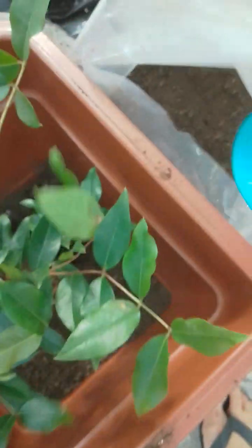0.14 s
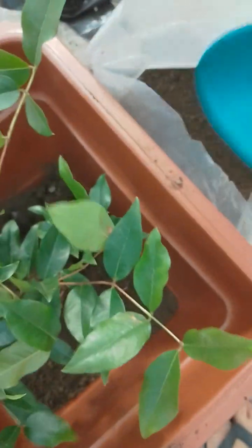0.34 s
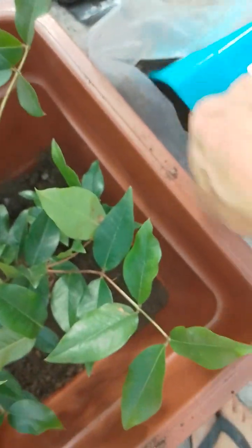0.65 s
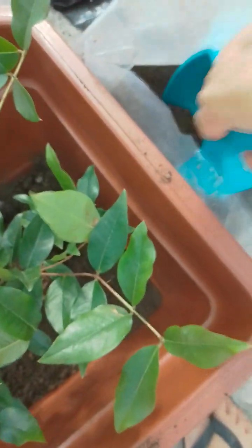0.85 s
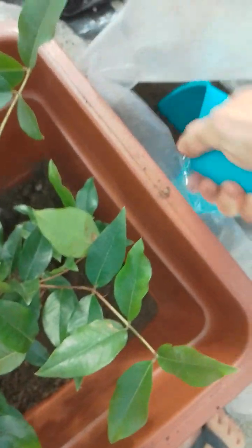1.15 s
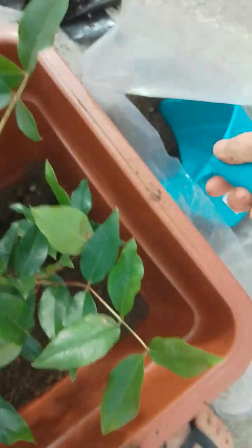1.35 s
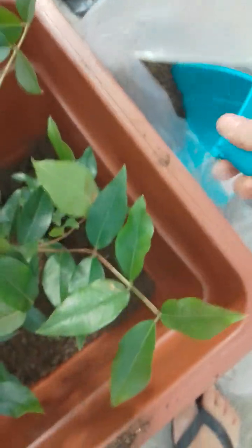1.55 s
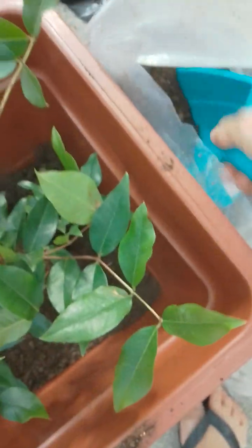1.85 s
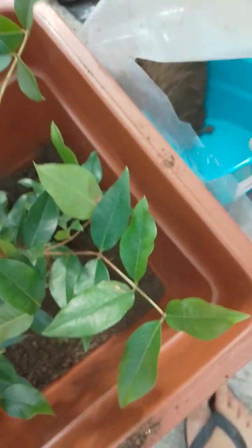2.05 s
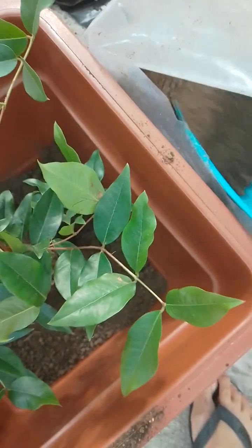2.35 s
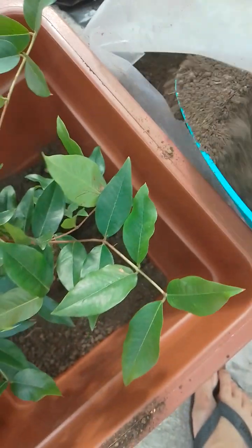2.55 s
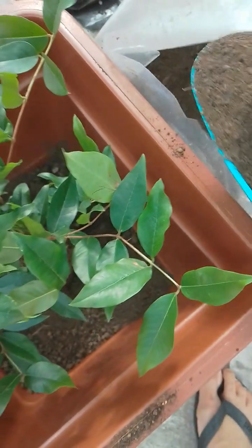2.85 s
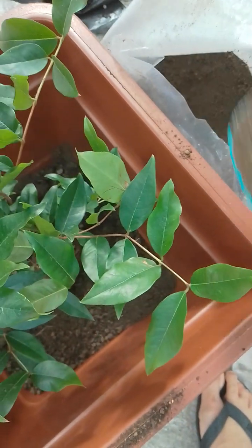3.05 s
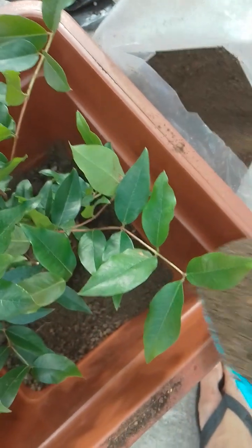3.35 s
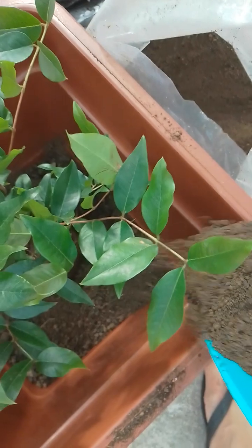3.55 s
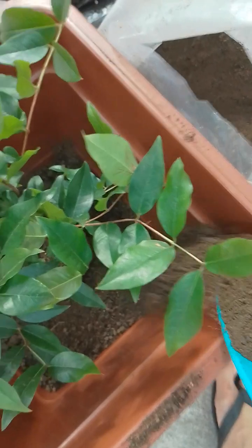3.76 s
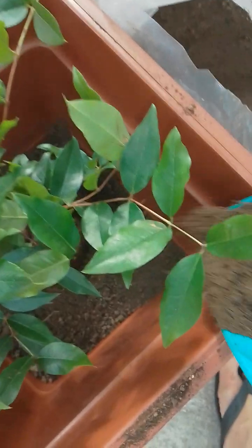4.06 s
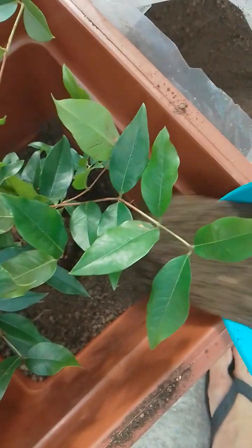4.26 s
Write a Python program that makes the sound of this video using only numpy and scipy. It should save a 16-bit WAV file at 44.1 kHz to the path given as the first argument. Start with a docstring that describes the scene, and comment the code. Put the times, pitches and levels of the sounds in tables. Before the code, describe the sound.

Very quiet at first, with a faint low bag movement around 0.2 seconds. From 0.3 to 1.0 a plastic scoop pushes into potting soil: bright airy hiss of grit over bag film, crackling creases, coarse rasp, and a sharp snap at 0.9 with a low boom. From 1.1 to 1.8 the film quiets and hollow plastic scraping and pebble ticks stand out, with another soft boom near 1.6. A lull around 1.9 to 2.1, then a longer, fuller drag from 2.2 to 3.0, gritty and hissing, with snaps, dull lumps and bassy bumps near 2.7 and 2.8. It fades to near silence by 3.3. From about 3.75 to 4.05 soil tips into the planter in a short gritty rush with fine bright crackles and a small hollow thud at 4.0. A faint low rub of scoop on rim closes it at 4.4. Close, dry, small-room sound.

```python
"""Bag film hisses and snaps as a plastic scoop digs potting soil, is dragged out and tipped into a planter.
Hiss, rasp, boom and shifting soil: filtered noise on level curves. Snaps and knocks: short noise bursts.
Thuds: decaying sines. Scoop on rim: resonant noise. Short copies from surfaces near the hand comb the
colour; a faint room tail and still air lie beneath."""
import sys
import numpy as np
from scipy import signal
from scipy.fft import rfft, irfft, next_fast_len
from scipy.io import wavfile
from scipy.ndimage import map_coordinates

SR = 44100
rng = np.random.default_rng(int(sys.argv[2]) if len(sys.argv) > 2 else 0)


def pcm_store(signal):
    """Save signal as 16-bit PCM."""
    levels = np.round(np.clip(np.atleast_2d(signal), -1, 1) * 32767)
    wavfile.write(sys.argv[1], SR, levels.astype(np.int16).T)


def ratio(d):
    """dB to gain"""
    e = np.asarray(d, float) / 20
    return 10 ** e


N = 194436  # samples


def unit(x):
    """Scale to rms 1."""
    return x / np.sqrt(np.mean(x ** 2) + 1e-20)


def along(points, hz):
    """Interpolate (f/Hz, value) points on a log frequency axis."""
    f, value = np.transpose(points)
    return np.interp(np.log(hz + 1), np.log(f + 1), value)


def curves(rows):
    """One value per sample for each column after the time."""
    s, *columns = np.transpose(rows)
    return [np.interp(np.arange(N) / SR, s, column) for column in columns]


def wobble(rate_hz):
    """Smooth random curve, rate_hz knots a second."""
    knots = rng.standard_normal(int(N * rate_hz / SR) + 4)
    return map_coordinates(knots, [np.arange(N) * rate_hz / SR])


def filtered(x, response):
    """Apply a complex response of frequency."""
    m = next_fast_len(N + 8192)
    return irfft(rfft(x, m) * response(np.fft.rfftfreq(m, 1 / SR)), m)[..., :N]


def shaped(x, points):
    """Unit-rms x, coloured by (f/Hz, level/dB) points."""
    return unit(filtered(x, lambda hz: ratio(along(points, hz))))


def modes(table):
    """Causal response of second-order resonances, summed with alternating sign."""
    def response(f):
        return sum((-1) ** k * ratio(db) * 1j * f * width / (centre * centre - f * f + 1j * f * width)
                   for k, (centre, width, db) in enumerate(table))
    return response


def grit(rate_hz, spread_db, smooth, clump_db):
    """Grains of uneven size in clumps, over a smooth share of noise."""
    sizes = (rng.random(N) < rate_hz / SR) * ratio(2 * spread_db * rng.exponential(size=N))
    decay = np.exp(-np.arange(400) / SR / 0.00067)  # power falls by 1/e in 0.67 ms
    power = signal.fftconvolve(sizes, decay)[:N]
    share = np.clip(smooth, 0, 1)
    envelope = np.sqrt(share + (1 - share) * abs(power) / power.mean())
    clumps = ratio(clump_db * (wobble(24.53) + 0.81 * wobble(90)))
    return unit(envelope * rng.standard_normal(N) * clumps)


def small(level_db, lo_hz, hi_hz, t60_ms, count, spread_db=2):
    """Random events (t/s, level/dB, f/Hz, t60/ms) whose strength follows a level curve."""
    when, size, pitch = rng.random((count, 3)).T
    db = level_db[(when * N).astype(int)] - spread_db * np.log(1 - size)
    hz = lo_hz * (hi_hz / lo_hz) ** pitch
    return [(s, d, f, t60_ms) for s, d, f in zip(when * N / SR, db, hz)]


def bursts(events, response, rise_ms, gain_db):
    """A short noise burst for each event (t/s, level/dB, f/Hz, t60/ms), coloured round its own pitch."""
    out, t = np.zeros(N + 2048), np.arange(2048) / SR
    f = np.fft.rfftfreq(2048, 1 / SR)
    for s, db, hz, t60_ms in events:
        rise = 1 - np.exp(-(1000 * t / rise_ms) ** 2)
        shape = rise * ratio(-60000 * t / max(t60_ms, 2))
        burst = irfft(rfft(shape * rng.standard_normal(2048)) * response(f, hz))
        out[round(s * SR):][:2048] += ratio(db + gain_db) * burst / abs(burst).max()
    return out[:N]


# still-air spectrum: (f/Hz, relative level/dB per Hz)
AIR_SPECTRUM = [(25, 8), (60, 3.5), (200, -10.5), (500, -25), (900, -10), (1600, -27.5), (3000, -20),
                (8000, -43), (12000, -34), (16000, -20)]


def still_air():
    """Steady noise floor with a fixed spectrum."""
    level_db = -76.5
    return ratio(level_db) * shaped(rng.standard_normal(N), AIR_SPECTRUM)


# room decay: (f/Hz, t60/s)
ROOM_DECAY = [(200, 0.14), (2000, 0.34), (10000, .12)]


def room(x):
    """Diffuse noise tail after a short delay; each frequency dies at its own speed."""
    hz, t, z = signal.stft(rng.standard_normal(SR // 2), SR, nperseg=256)
    decay = ratio(-60 * t / along(ROOM_DECAY, hz)[:, None])
    tail = signal.istft(z * decay, SR, nperseg=256)[1]
    delayed = np.pad(x, (300, 0))
    return signal.fftconvolve(delayed, tail / np.linalg.norm(tail))[:N]


# surfaces facing the hand for a while: (start t/s, end t/s, delay/ms, signed share)
SURFACES = [(0, .3, .311, .39), (0, .3, .379, .3), (.3, 1.1, .325, .14), (.3, .62, .79, -.22),
            (.3, .62, 1.77, -.16), (.45, 1.1, 1.63, -.13), (.9, 1.1, .63, .17), (1.1, 1.5, .325, .4),
            (1.1, 1.5, .525, -.24), (1.1, 1.5, .6, .25), (1.1, 1.85, .812, -.3), (1.1, 2.45, 1.14, -.24),
            (1.1, 1.5, 1.555, -.2), (1.5, 1.85, .885, .2), (1.5, 1.85, 1.285, -.25), (1.5, 1.85, 1.38, .33),
            (1.5, 1.85, 1.445, .22), (1.85, 2.1, .6, .3), (1.85, 2.1, .68, -.3), (1.7, 2.45, 1.615, -.25),
            (2.1, 2.45, 1.395, .22), (2.1, 2.75, 1.485, -.28), (2.1, 2.45, 1.55, .2),
            (2.45, 3.1, 1.345, .15), (2.45, 3.5, .335, .2), (2.75, 3.1, 1.01, -.22),
            (2.75, 3.1, 1.265, -.18), (2.75, 3.5, 1.638, -.22), (2.85, 3.1, 2.793, -.2),
            (3.1, 3.5, .665, -.22), (3.1, 3.5, .75, .22), (3.6, 4.1, .378, .24), (3.6, 3.88, 1.73, -.24),
            (3.6, 3.88, 1.82, .32), (3.6, 4.1, .95, -.4), (3.88, 4.1, .886, -.35), (3.7, 4.1, .575, .26),
            (3.88, 4.1, .712, -.36), (3.88, 4.1, 1.07, .3), (3.88, 4.1, 1.185, -.28),
            (3.88, 4.5, 1.515, .24), (3.88, 4.5, 1.62, -.2), (4.1, 4.5, 1.425, -.18)]


def nearby(x):
    """Short copies fade in and out as surfaces, and passing folds of the bag, turn toward the hand."""
    turn_s, fold_s, fold_share = 0.087, 0.84, 0.076
    when, far, sign = rng.random((14, 3)).T
    middle_s = when * N / SR
    delay_ms = 2.0 + 2.0 * far
    folds = np.transpose([middle_s - fold_s / 2, middle_s + fold_s / 2,
                          delay_ms, fold_share * np.sign(sign - .5)])
    rows = np.vstack([SURFACES, folds])
    copies = filtered(x, lambda hz: np.exp(-2j * np.pi * np.outer(rows[:, 2], hz) / 1000))
    t, out, power = np.arange(N) / SR, x.copy(), np.ones(N)
    for (start, end, _, share), copy in zip(rows, copies):
        gain = share * np.clip(np.minimum(t - start, end - t) / turn_s + .5, 0, 1)
        out += gain * copy
        power += gain ** 2
    return out / np.sqrt(power)


# planter rim under the resting scoop: (f/Hz, width/Hz, level/dB)
RIM_MODES = [(130.4, 10, -2), (685, 72, -2.5)]
# rub of scoop on rim: (t/s, level/dB)
RUB_LEVEL = [(4.08, -88), (4.16, -73), (4.25, -67.5), (4.41, -68)]


def rest():
    """The emptied scoop rubs along the rim: noise through the rim's resonances."""
    rub = filtered(rng.standard_normal(N), modes(RIM_MODES))
    rub = filtered(rub, modes([(300, 780, 0)]))
    return ratio(curves(RUB_LEVEL)[0]) * unit(rub)


# bag resonances: (f/Hz, width/Hz, level/dB)
BAG_MODES = [(83.1, 23, -1.5), (60, 81, -8.5), (120, 63, -7)]
# spectrum of shifting soil: (f/Hz, relative level/dB per Hz)
SOIL_SPECTRUM = [(100, -12), (160, 2.5), (280, 0.5), (450, -3), (700, -6.5), (1200, -27)]
# moving weight: (t/s, boom level/dB, shifting soil level/dB)
LOAD_LEVELS = [(0, -77.5, -72.5), (.18, -51.5, -70), (.27, -56, -73.5), (.36, -53.5, -52.5),
               (.45, -58, -71), (.53, -61, -48.5), (.7, -92, -57.5), (.87, -74, -59), (.99, -47, -54),
               (1.1, -54, -61), (1.28, -58.5, -65.5), (1.37, -78, -58), (1.52, -59.5, -57),
               (1.57, -43, -58.5), (1.66, -51.5, -70), (1.73, -54, -51.5), (1.82, -52.5, -64.5),
               (2.04, -73.5, -77.5), (2.14, -57, -55.5), (2.25, -47.5, -54.5), (2.32, -53.5, -56),
               (2.47, -57.5, -50), (2.64, -62.5, -50.5), (2.7, -41.5, -54.5), (2.77, -57, -50.5),
               (2.81, -43.5, -57.5), (2.9, -52, -51.5), (2.94, -59, -54.5), (3.1, -55.5, -62.5),
               (3.16, -66.5, -72.5), (3.45, -72.5, -83), (3.57, -83.5, -83.5), (3.73, -78, -83),
               (3.77, -61.5, -65), (3.84, -75.5, -60), (4.03, -71, -59.5), (4.15, -78, -72.5),
               (4.41, -62.5, -99)]


def load():
    """The heavy bag booms at its resonances; the mass of soil shifts as sparse low grit."""
    boom_db, soil_db = curves(LOAD_LEVELS)
    boom = filtered(rng.standard_normal(N), modes(BAG_MODES))
    boom = unit(filtered(boom, modes([(85, 51, 0)])))
    soil = shaped(grit(190, 2.8, 0.42, 0.64), SOIL_SPECTRUM)
    return ratio(boom_db) * boom + ratio(soil_db) * soil


# lumps landing: (t/s, relative level/dB, f/Hz, t60/ms)
LUMPS = [(0.951, -31.5, 204, 50), (2.287, -27, 150, 38), (2.446, -29, 798, 60), (2.601, -26.5, 256, 44),
         (2.972, -28.5, 297, 39), (3.751, -34, 258, 63), (4.007, -18, 544, 23.4)]


def thuds():
    """Lumps of soil land on plastic: soft-onset sines with exponential decay."""
    out, t = np.zeros(N + SR), np.arange(SR // 5) / SR
    for s, db, hz, t60_ms in LUMPS:
        decay = ratio(db - 1.0 - 60000 * t / t60_ms)
        onset = 1 - np.exp(-t / 0.006)
        out[round(s * SR):][:len(t)] += decay * onset * np.sin(2 * np.pi * hz * t)
    return out[:N]


# hand strokes: (t/s, relative hiss level/dB, relative rasp level/dB)
STROKE_LEVELS = [(0, -85, -67.5), (.186, -91.5, -76.5), (.265, -77.5, -61.5), (.333, -50, -56),
                 (.4, -53, -59.5), (.513, -44, -44), (.575, -52.5, -66), (.641, -42, -51.5),
                 (.712, -40, -44), (.826, -47, -52.5), (.894, -37.5, -45.5), (.95, -49.5, -56.5),
                 (1.11, -58, -48), (1.19, -61, -48), (1.22, -59.5, -48.5), (1.269, -62.5, -43.5),
                 (1.339, -74.5, -55.5), (1.391, -69, -43), (1.511, -79, -54.5), (1.544, -64.5, -52),
                 (1.63, -57.5, -48.5), (1.688, -64, -51.5), (1.765, -59.5, -58), (1.83, -78, -64.5),
                 (1.892, -71, -60.5), (1.95, -83, -70), (1.99, -79, -63.5), (2.013, -66, -59),
                 (2.103, -80, -63.5), (2.131, -68.5, -51.5), (2.225, -56.5, -45.5), (2.303, -52, -44),
                 (2.411, -51.5, -48.5), (2.46, -45, -39.5), (2.526, -44.5, -49), (2.614, -43.5, -43.5),
                 (2.75, -51, -52.5), (2.965, -48, -46), (3.045, -54, -52), (3.105, -63, -59),
                 (3.257, -83, -71.5), (3.488, -93, -82.5), (3.706, -90.5, -71.5), (3.736, -85, -69.5),
                 (3.807, -81, -68), (3.839, -63, -56.5), (3.933, -51, -47.5), (3.979, -50, -57),
                 (4.005, -49, -49.5), (4.061, -63, -60.5), (4.143, -72.5, -70), (4.41, -81, -76)]


def stroke():
    """Hiss and rasp level curves in dB, shared by all sounds the strokes drive."""
    return curves(STROKE_LEVELS)


# scoop shell resonances: (f/Hz, width/Hz, level/dB)
SHELL_MODES = [(495, 100, -7), (884, 110, 3), (1380, 110, 1.5), (2065, 220, -9), (2900, 57, -9)]


def shell(f):
    """Modal response of the scoop's shell."""
    return modes(SHELL_MODES)(f)


# pebble taps: (t/s, relative level/dB, strongest f/Hz)
TAPS = [(0.313, -47, 850), (0.334, -38.5, 805), (0.395, -31.5, 2140), (0.478, -31, 920),
        (0.545, -29.5, 1900), (0.775, -26.5, 1650), (0.9, -26.5, 1520), (1.082, -49, 860),
        (1.153, -33, 980), (1.214, -28.5, 1420), (1.258, -38, 820), (1.368, -36, 1290),
        (1.383, -32.5, 1300), (1.393, -27.5, 1300), (1.532, -27, 1400), (1.559, -31, 1290),
        (1.573, -34.5, 1320), (1.72, -35.5, 985), (1.894, -42, 920), (2.006, -46.5, 931),
        (2.135, -34.5, 900), (2.166, -34, 920), (2.193, -31.5, 915), (2.242, -31.5, 1380), (2.28, -30, 870),
        (2.337, -34.5, 1990), (2.457, -28, 900), (2.602, -38, 1020), (2.722, -42.5, 820),
        (2.77, -33.5, 2470), (3.011, -36, 1480), (3.133, -45, 1036), (3.609, -57.5, 919),
        (3.752, -44.5, 950), (3.775, -43, 2170), (3.846, -38, 1610), (3.898, -32, 2050),
        (3.926, -32.5, 1430), (3.998, -35.5, 1430)]


def knocks():
    """Pebbles tap the shell: short bursts at a pitch of their own plus the shell modes, treble softened."""
    t60_ms = 11.5
    taps = [(*tap, t60_ms) for tap in TAPS]
    taps += small(stroke()[1] - 4, 710, 2400, t60_ms, count=60)

    def response(f, hz):
        soft = 1 / (1 + 1j * f / 3400.0) ** 2
        return (modes([(hz, 350, 0)])(f) + 0.37 * shell(f)) * soft
    return bursts(taps, response, rise_ms=0.42, gain_db=-2.1)


# upper shell modes: (t/s, lift/dB)
UPPER_LIFT = [(0, -5.5), (.5, -10), (1.1, -1.5), (1.45, 1.5), (1.8, 3), (2.0, -2.5), (2.3, 6), (2.7, 2.5),
              (2.95, 3.5), (3.06, 6), (3.3, -0.5), (3.7, 0.5), (3.9, 5.5), (4.1, 6.5), (4.41, 1)]


def rasp():
    """Coarse grit scrapes the scoop and rings its shell; the level of its upper modes varies."""
    grains = grit(400, 2.05, 0.51, 1.15)
    ring = unit(filtered(grains, lambda hz: shell(hz) / (1 + 1j * hz / 1600.0)))
    upper = filtered(ring, lambda hz: hz ** 8 / (hz ** 8 + 1820.0 ** 8))
    lifted = ring + (ratio(curves(UPPER_LIFT)[0]) - 1) * upper
    return ratio(stroke()[1] - 3.5) * lifted


# film creases: (t/s, relative level/dB, centre f/Hz, t60/ms)
CREASES = [(0.4768, -20.5, 5600, 21), (0.5106, -21.5, 5760, 15), (0.5196, -20.5, 2980, 17),
           (0.5457, -16, 9400, 12.5), (0.5533, -16, 3330, 16), (0.8741, -22.5, 6000, 28),
           (0.9001, -6.5, 6440, 8.1), (1.0778, -26.5, 6300, 4.2), (1.151, -33.5, 5430, 9.3),
           (1.2123, -22, 6250, 35), (1.272, -34.5, 2900, 9.3), (1.5322, -30, 2780, 17),
           (1.616, -28, 10000, 15), (1.7295, -26, 9900, 17), (1.887, -56, 2800, 12.5),
           (2.0039, -34, 6750, 13.5), (2.134, -58.5, 2850, 12.5), (2.1505, -49, 2790, 12.5),
           (2.166, -52, 2960, 12.5), (2.2187, -19.5, 7700, 16), (2.3366, -32, 2810, 15),
           (2.4503, -22.5, 2770, 29), (2.562, -22, 2940, 18), (2.6022, -22.5, 3020, 9.1),
           (2.6694, -25, 2720, 12.5), (2.7708, -19, 3620, 12.5), (2.9704, -30, 7610, 10),
           (3.0474, -37, 9000, 12.5), (3.2857, -58, 2560, 12.5), (3.3997, -58.5, 2730, 12.5),
           (3.7737, -43, 5270, 16), (3.8437, -29, 10500, 6), (3.8892, -25.5, 10700, 12.5),
           (3.9309, -21.5, 8800, 17), (3.982, -19.5, 10000, 20), (4.0144, -29, 4850, 12.5),
           (4.0527, -31, 5760, 11), (4.0687, -29, 7100, 8.9)]


def snaps():
    """Each crease of film snaps: broad crackle with a peak of its own."""
    creases = list(CREASES) + small(stroke()[0] + 16, 2700, 12000, t60_ms=12, count=90)

    def response(f, hz):
        return modes([(hz, .5 * hz, 0)])(f) + 0.23 * modes([(6000, 9000, 0)])(f)
    return bursts(creases, response, rise_ms=0.85, gain_db=-4)


# film spectrum: (f/Hz, relative level/dB per Hz)
FILM_SPECTRUM = [(900, -33.5), (1500, -5.5), (2200, -6), (3500, -5.5), (5000, -1.5), (7000, -2.5),
                 (10000, -1.5), (12500, -10.5), (16000, -13)]
# hiss colour: (t/s, relative level of low part/dB, top-end lift/dB)
HISS_COLOUR = [(0, -3, 5), (.4, -5, -24), (.52, -3.5, 9.5), (.7, -4, 18.5), (1.15, -6, -6),
               (1.45, -8.5, -19), (1.62, -5.5, 12), (1.76, -10.5, 12), (2.0, -9, 1), (2.1, -4.5, 1),
               (2.2, -7.5, -32), (2.31, -3, -11), (2.44, -5.5, -10.5), (2.6, -5, -26), (3, -6, 13.5),
               (3.1, -8, 6), (3.25, -5.5, 11), (3.5, -2.5, 4), (3.75, 1.5, 14), (3.9, -6.5, 15.5),
               (4.4, -2, 7)]


def hiss():
    """Fine soil slides over the bag film; its colour tips with the angle to the microphone."""
    low_db, top_db = curves(HISS_COLOUR)
    rush = shaped(grit(1500, 1.9, 0.55, 1.4), FILM_SPECTRUM)
    top = filtered(rush, lambda hz: hz ** 4 / (hz ** 4 + 15840.0 ** 4))
    low = filtered(rush, lambda hz: 5860.0 ** 4 / (hz ** 4 + 3650.0 ** 4))
    tilted = rush + (ratio(top_db) - 1) * top + (ratio(low_db + 5.5) - 1) * low
    return ratio(stroke()[0] + 1.5) * tilted


def scene():
    """Hand sounds with their copies, thuds, rim rub and room, over the still air."""
    hand = nearby(hiss() + rasp() + snaps() + knocks() + load()) + thuds() + rest()
    return (hand + ratio(-18) * room(hand) + still_air())[None]


def roll_off(x):
    """The treble ends steeply here."""
    return signal.sosfilt(signal.butter(12, 16650, fs=SR, output="sos"), x)


def record(dry):
    """A small microphone that loses the deep bass and the top."""
    lows = signal.butter(2, 55, "high", fs=SR, output="sos")
    tops = signal.butter(6, 12000, fs=SR, output="sos")
    mix = signal.sosfilt(np.vstack([lows, tops]), dry)
    return roll_off(mix)


dry = scene()
out = record(dry)
pcm_store(out)
```